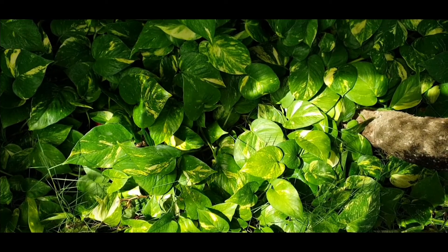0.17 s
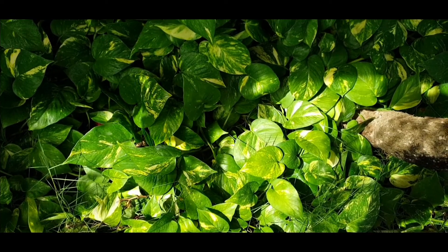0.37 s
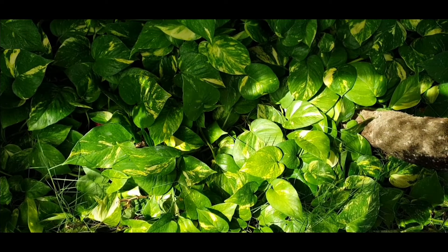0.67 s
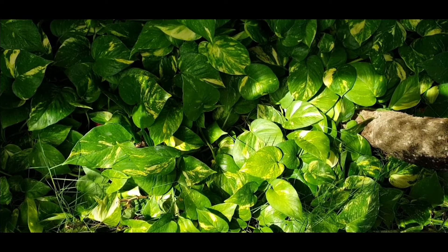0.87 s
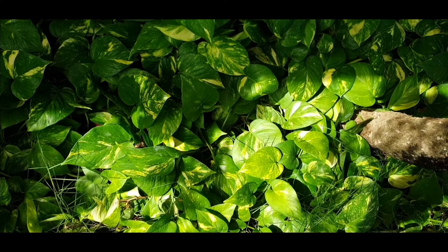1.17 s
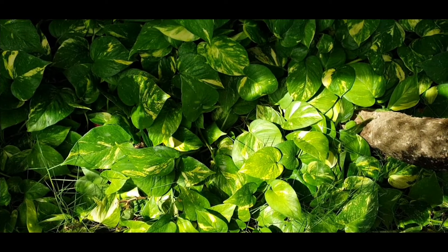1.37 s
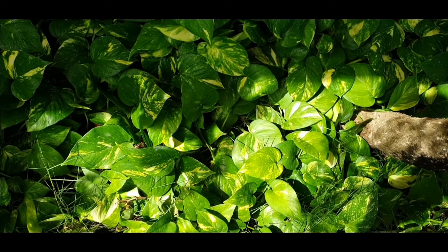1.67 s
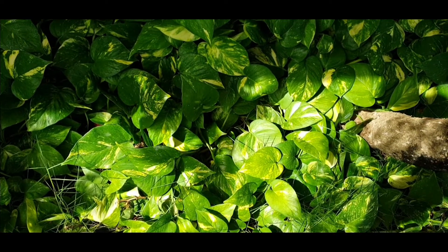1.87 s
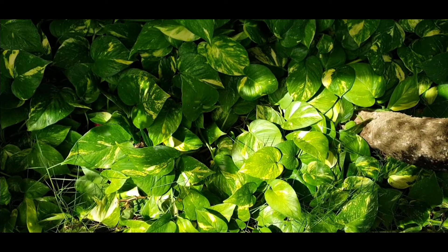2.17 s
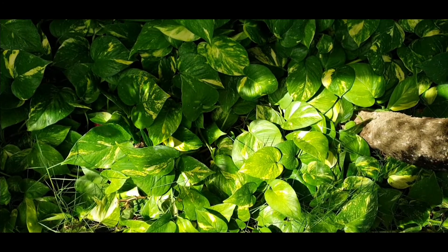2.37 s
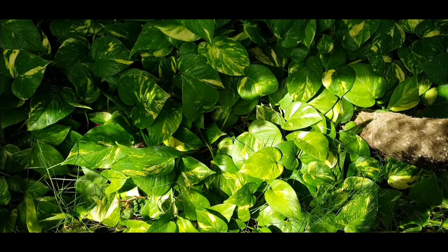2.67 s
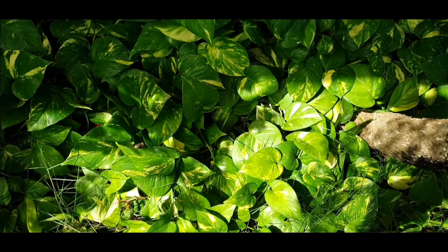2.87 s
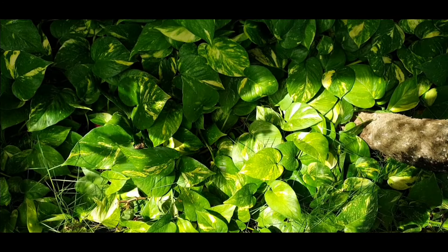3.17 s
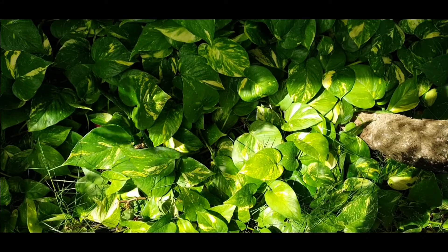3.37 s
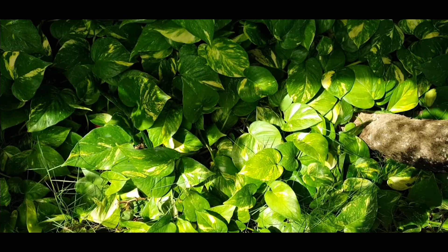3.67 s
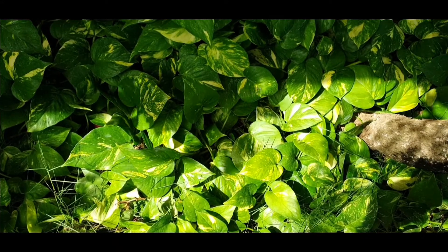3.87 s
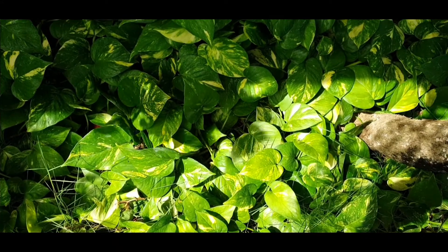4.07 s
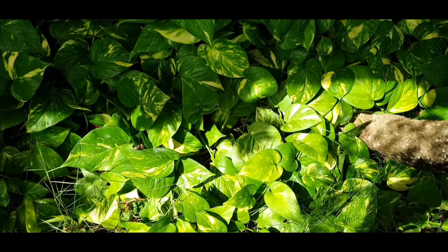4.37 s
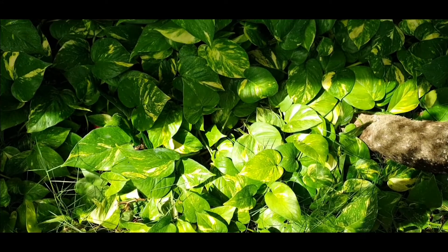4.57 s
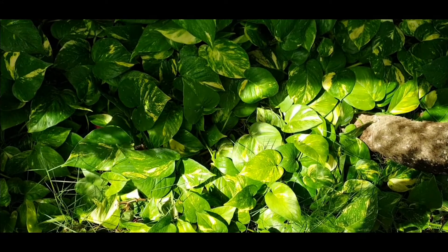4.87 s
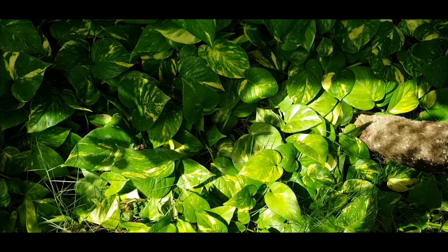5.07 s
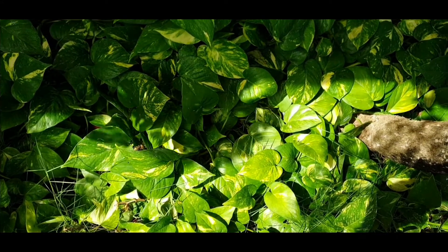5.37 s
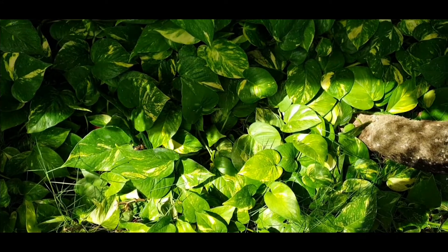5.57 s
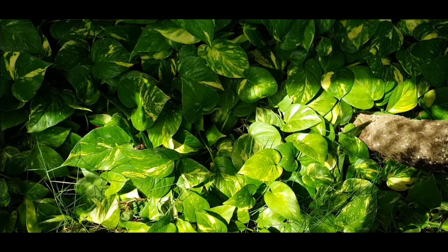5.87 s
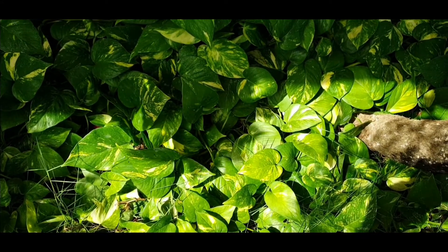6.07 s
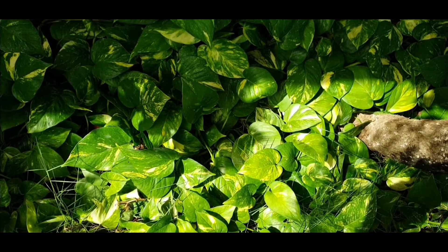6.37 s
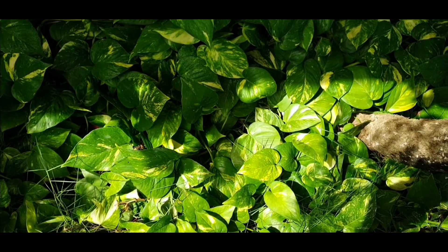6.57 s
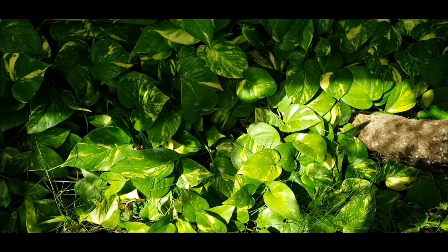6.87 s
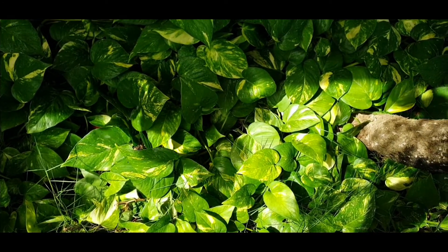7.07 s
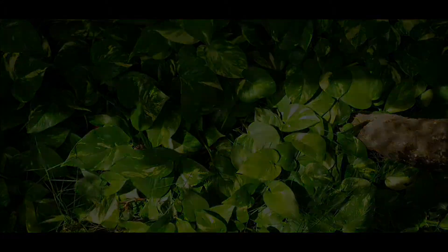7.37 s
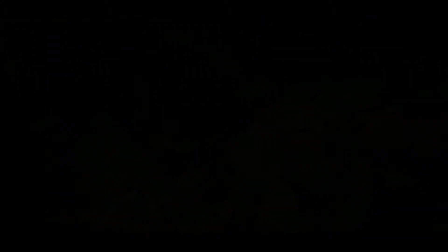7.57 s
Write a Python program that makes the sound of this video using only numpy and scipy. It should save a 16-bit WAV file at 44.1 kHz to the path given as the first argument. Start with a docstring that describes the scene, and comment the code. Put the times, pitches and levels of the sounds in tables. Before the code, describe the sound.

Leaves rustle softly and steadily in a garden breeze, the closest plants on the right giving a few dry ticks. Wind puffs briefly on the microphone at the start, then returns after a lull as irregular low buffeting and thumps on the left, louder than everything else. A few faint birds chirp, whistle and buzz from the trees over a low, distant rumble.

```python
"""Leaves rustle all round a garden as a light breeze brushes them together, the nearest on the right.
Gusts buffet the stereo microphone in short, low puffs, nearly all on its left port; hard eddies slap it.
A few birds whistle and buzz from the trees, each call one gliding tone with scattered echoes.
Behind them lie a thin blur of distant chirps and a low, far-off rumble."""
import sys
import numpy as np
from scipy import signal
from scipy.fft import rfft, irfft
from scipy.io import wavfile
from scipy.ndimage import uniform_filter1d

SR = 44100
rng = np.random.default_rng(int(sys.argv[2]) if len(sys.argv) > 2 else 0)


def dump_mix(stems):
    """Bounce the given channels to the path in sys.argv[1] as a 16-bit WAV at rate SR."""
    frames = np.atleast_2d(stems).T  # one column per channel
    limited = np.clip(frames, -1, 1)  # hard clip at full scale
    pcm = np.round(limited * 32767).astype(np.int16)
    wavfile.write(sys.argv[1], SR, pcm)


N = 340452
TIME = np.arange(N) / SR


def undb(db):
    """Decibels to gain."""
    return 10 ** (np.asarray(db) / 20)


def unit(x):
    """Scale to rms 1."""
    return x / np.sqrt(np.mean(x ** 2) + 1e-18)


def curve(rows):
    """Join rows of (seconds, value) with straight lines, sample by sample."""
    return np.interp(TIME, *np.transpose(rows))


def colour(x, points):
    """Filter by a curve of (Hz, dB) points, rolling off below the first; the result has rms 1."""
    hz, db = np.transpose(points)
    f = np.arange(N // 2 + 1) * SR / N + 1e-3
    skirt = np.minimum(f / hz[0], 1) ** 2
    gain = undb(np.interp(np.log(f), np.log(hz), db))
    return unit(irfft(rfft(x) * skirt * gain, N))


def walk(per_s):
    """A smooth random wander of rms 1 that takes per_s steps a second."""
    hold = max(int(SR / per_s), 2)
    steps = np.repeat(rng.standard_normal(N // hold + 1), hold)
    return unit(uniform_filter1d(uniform_filter1d(steps, hold), hold)[:N])


def add(track, start_s, sound):
    """Mix a sound into a track at a given time."""
    at = int(start_s * SR) + np.arange(len(sound))
    inside = (at >= 0) & (at < N)
    track[at[inside]] += sound[inside]


# The rumble from far beyond the garden. Each row: frequency in Hz, relative level in dB.
RUMBLE_SPECTRUM = [(20, -7), (40, -13), (65, 4.5), (115, 0), (170, -8), (240, -5.5), (340, -13), (700, -15),
                   (1000, -24), (2000, -37.5)]
# Its slow swell at the microphone. Each row: time in seconds, base level in dB.
RUMBLE_LEVELS = [(0, -49), (1.0, -47.5), (1.9, -49.5), (2.4, -50.5), (4.1, -53), (5.2, -52), (7.7, -50)]


def rumble():
    """Distant low noise reaches both ports almost alike; a faint far tone fades out of it."""
    common = colour(rng.standard_normal(N), RUMBLE_SPECTRUM)
    per_port = np.array([colour(rng.standard_normal(N), RUMBLE_SPECTRUM) for _ in range(2)])
    tone_hz = 700 + 11 * walk(40)
    tone_db = -62.5 + 1.4 * walk(4.56) - 1.4 * TIME
    tone = np.sin(2 * np.pi * np.cumsum(tone_hz) / SR) * undb(tone_db)
    swell = undb(curve(RUMBLE_LEVELS) + .8 * walk(4.6))
    return (common + undb(-11.5) * per_port) * swell + tone * np.array([[1], [.5]])


# Birds too far off to tell apart. Each row: band centre in Hz, width in Hz, full level in dB.
FAR_BIRD_BANDS = [(2835, 170, -65.5), (3305, 360, -63)]


def far_birds(fade_in_s=2):
    """Many distant chirps blur into two thin, flickering bands of noise."""
    out = np.zeros((2, N))
    for hz, width_hz, db in FAR_BIRD_BANDS:
        band = signal.butter(2, [hz - width_hz / 2, hz + width_hz / 2], "band", fs=SR, output="sos")
        blur = unit(signal.sosfilt(band, rng.standard_normal((2, N))))
        out += blur * undb(db + 1.15 * walk(18))
    return out * np.clip(TIME / fade_in_s, 0, 1)


def garden_echoes(x, t60_s=.5):
    """Trunks and walls scatter a short tail of echoes, different at each port."""
    t = TIME[:SR]
    tails = rng.standard_normal((2, SR)) * np.exp(-np.log(1000) * t / t60_s) * (1 - np.exp(-t / .008))
    tails /= np.sqrt(np.sum(tails ** 2, axis=1, keepdims=True))
    return signal.fftconvolve(x, tails, axes=1)[:, :N]


def bird_note(length_s, start_hz, end_hz, ease, hoarse_hz, buzz_depth_hz=0, buzz_rate_hz=283):
    """One gliding whistle: a fast warble makes it buzz, an uneven one makes it hoarse."""
    u = np.linspace(0, 1, int(length_s * SR))
    glide = end_hz + (start_hz - end_hz) * (1 - u) ** ease  # ease over 1 levels off, under 1 droops late
    warble_hz = buzz_rate_hz * (1 + .019 * walk(80)[:len(u)])
    warble = np.sin(2 * np.pi * np.cumsum(warble_hz) / SR)
    hz = glide + buzz_depth_hz * warble + hoarse_hz * walk(700)[:len(u)]
    swell = (u * (1 - u)) ** .8
    return unit(np.sin(2 * np.pi * np.cumsum(hz) / SR) * swell)


# Thin, buzzing calls, dead centre, that slide down and level off.
# Each row: start in seconds, length in seconds, final pitch in Hz, dry level in dB.
BUZZING_CALLS = [(-.11, 0.22, 7700, -51), (3.609, .25, 7520, -48.5), (4.767, .26, 7660, -51.5)]
# Short falling chips from a bird on the right. Each row: start in seconds, dry level in dB.
RIGHT_CHIPS = [(2.29, -58), (2.382, -55.5), (2.608, -57.5), (5.995, -54), (6.102, -56), (6.212, -52),
               (6.3, -55)]
# Slurred chirps from the trees on either side. Each row: start in seconds, starting pitch in Hz,
# dry level in dB, hoarseness in Hz, left minus right in dB.
SLURRED_CHIRPS = [(.01, 2680, -54.5, 110, 20), (2.38, 2810, -57, 180, 14), (4.56, 3580, -55.5, 220, -7),
                  (5.115, 3550, -52, 250, -5), (6.069, 3390, -51.5, 180, -3), (6.605, 3540, -53, 160, -6),
                  (7.065, 3235, -51, 160, 5), (7.514, 3580, -48, 40, 9), (7.586, 3240, -53, 50, 12.5)]
# Whistles from the trees, sagging a little. Each row: start in seconds, length in seconds,
# starting pitch in Hz, dry level in dB, left minus right in dB.
SAGGING_WHISTLES = [(2.92, .34, 4890, -59, -18), (3.45, .11, 2857, -48.5, 14.5), (6.66, .2, 4880, -65, -1),
                    (7.12, .15, 2790, -61, 2)]


def birds(echo_db=-2, chip_pan_db=-11):
    """Four kinds of call reach the microphone from the trees, directly and as echoes."""
    calls = [(s, db, 0, bird_note(length, 9000, hz, ease=2.4, hoarse_hz=24.7, buzz_depth_hz=300))
             for s, length, hz, db in BUZZING_CALLS]
    calls += [(s, db, chip_pan_db, bird_note(.05, 5340, 4950, ease=1.1, hoarse_hz=189))
              for s, db in RIGHT_CHIPS]
    calls += [(s, db, pan_db, bird_note(.0895, hz, .91 * hz, ease=1.8, hoarse_hz=hoarse_hz))
              for s, hz, db, hoarse_hz, pan_db in SLURRED_CHIRPS]
    calls += [(s, db, pan_db, bird_note(length, hz, hz - 80, ease=.574, hoarse_hz=28))
              for s, length, hz, db, pan_db in SAGGING_WHISTLES]
    direct = np.zeros((2, N))
    for s, db, pan_db, sound in calls:
        add(direct[0], s, sound * undb(db + pan_db / 2))
        add(direct[1], s, sound * undb(db - pan_db / 2))
    wet = undb(echo_db)
    return (direct + wet * garden_echoes(direct)) / np.hypot(1, wet)


def eddies(noise, eddy_hz, port_hz=63.3, port_q=1.39, low_cut_hz=28):
    """Turbulent pressure on a resonant port: strong up to the eddy rate, falling away above it."""
    f = np.arange(len(noise) // 2 + 1) * SR / len(noise)
    ratio = f / port_hz
    resonance = ratio ** 2 / np.hypot(1 - ratio ** 2, ratio / port_q)
    low_cut = f / np.hypot(f, low_cut_hz)
    cascade = 1 / np.sqrt(1 + (f / eddy_hz) ** 5.17)
    damping = 1 / np.sqrt(1 + (f / (3.8 * eddy_hz)) ** 11)  # the smallest eddies die out
    return irfft(rfft(noise) * resonance * low_cut * cascade * damping, len(noise))


# Gusts right on the microphone. Each row: start in seconds, length in seconds, level in dB,
# eddy rate in Hz, port (0 left, 1 right).
MIC_GUSTS = [(0.106, 0.073, -33, 54, 0), (0.311, 0.09, -28, 45, 0), (.39, 0.16, -35, 52, 0),
             (2.057, 0.38, -48, 60, 0), (2.589, 0.06, -30.5, 67, 0), (2.684, 0.047, -32, 74, 0),
             (2.815, 0.12, -29, 65, 0), (2.939, 0.64, -27, 75.4, 0), (3.191, 0.16, -30.5, 58, 1),
             (3.569, 0.12, -32, 161, 0), (3.699, 0.051, -34, 67, 0), (3.78, 0.173, -29.5, 128, 0),
             (4.387, 0.051, -33.5, 86, 0), (4.549, 0.15, -37.5, 59, 1), (4.758, 0.093, -30.5, 80, 0),
             (4.873, .12, -37.5, 56, 0), (5.129, .17, -25.5, 94, 0), (5.395, 0.07, -27, 79, 0),
             (5.527, 0.048, -36, 161, 0), (5.624, .2, -23.5, 72.6, 0), (5.85, .17, -24.5, 80, 0),
             (6.04, 0.135, -28, 82.5, 0), (6.18, 0.085, -20.5, 93, 0), (6.254, .25, -36, 60, 0),
             (6.515, .06, -30, 53, 0), (6.992, 0.089, -30.5, 51, 0)]


def wind(draught_db=(-52, -58.5), attack_s=.018, release_s=.02, buffet_db=3.5):
    """Over a light draught on both ports, each gust rises on one, buffets it and drops away."""
    out = np.array([unit(eddies(rng.standard_normal(N), eddy_hz=50)) * undb(db + walk(4.4))
                    for db in draught_db])
    buffet = undb(buffet_db * walk(per_s=36))  # the pressure lurches within a gust
    for s, length, db, eddy_hz, port in MIC_GUSTS:
        noise = rng.standard_normal(2 ** 16)
        t = TIME[:int(length * SR)]
        ramp = np.clip(np.minimum(t / attack_s, (length - t) / release_s), 0, 1)
        swell = np.sin(np.pi / 2 * ramp) ** 2
        gust = eddies(noise, eddy_hz)[:len(t)] * swell * np.interp(s + t, TIME, buffet)
        add(out[port], s, unit(gust) * undb(db))
    return out


# Hard eddies striking the left port. Each row: time of the peak in seconds, core peak in dB, pitch in Hz.
MIC_SLAPS = [(2.975, -21, 195), (3.035, -20, 100), (3.081, -25, 190), (3.161, -19, 193),
             (3.304, -18.5, 195), (3.422, -23, 90), (3.535, -16, 200), (3.932, -19, 210),
             (5.230, -10.5, 240), (5.28, -18.5, 230), (5.92, -22, 130), (6.221, -20, 140)]


def wind_slaps(flurry_s=.07, flurry_db=-14):
    """A vortex core is a sharp suction between two small pushes, wrapped in a flurry of fast eddies."""
    out = np.zeros((2, N))
    swell = np.hanning(int(flurry_s * SR))
    for s, db, hz in MIC_SLAPS:
        x = np.linspace(-np.pi, np.pi, int(2 * SR / hz))
        core = (2 * x ** 2 - 1) * np.exp(-x ** 2)
        add(out[0], s - 1 / hz, core * undb(db))
        turbulence = eddies(rng.standard_normal(2 ** 14), eddy_hz=.73 * hz)
        flurry = unit(turbulence[:len(swell)] * swell)
        add(out[0], s - flurry_s / 2, flurry * undb(db + flurry_db))
    return out


# Single leaves tapping, mostly right of the microphone. Each row: start in seconds, level in dB,
# brightest frequency in Hz, decay in seconds, left minus right in dB.
LEAF_TAPS = [(0.066, -41, 4800, 0.012, -5), (1.306, -47, 12000, .006, -13), (1.607, -42, 12500, 0.012, -10),
             (1.756, -42, 3600, 0.02, -6), (2.208, -48, 12000, .008, -12), (6.273, -44, 5970, 0.0048, 2),
             (6.552, -51, 12000, .007, -10), (6.653, -52, 13000, .007, -9)]


def leaf_taps():
    """A stiff leaf flicks against another: a short, dry tick of noise."""
    out = np.zeros((2, N))
    t = TIME[:SR // 8]
    for s, db, hz, decay_s, pan_db in LEAF_TAPS:
        band = signal.butter(1, [.65 * hz, min(1.4 * hz, .45 * SR)], "band", fs=SR, output="sos")
        tick = unit(signal.sosfilt(band, rng.standard_normal((2, len(t))))) * np.exp(-t / decay_s)
        add(out[0], s, tick[0] * undb(db + pan_db / 2))
        add(out[1], s, tick[1] * undb(db - pan_db / 2))
    return out


def leaf_contacts(per_s, spread_db, scrape_s):
    """Leaves touch at random: each contact is a tiny scrape, most weak and a few strong."""
    hit = rng.random(N) < per_s / SR
    size = undb(spread_db * np.minimum(rng.exponential(size=N), 5))
    energy = signal.lfilter([1], [1, -np.exp(-1 / (scrape_s * SR))], hit * size ** 2)
    return unit(np.sqrt(energy) * rng.standard_normal(N))


# The breeze in the garden's foliage. Each row: time in seconds, base rustle level in dB.
BREEZE_LEVELS = [(0, -48), (0.4, -48.5), (0.8, -48), (1.2, -46.5), (1.7, -45.5), (2.2, -48), (2.75, -50),
                 (3.8, -49.5), (4.4, -50), (5.3, -50), (5.8, -49.5), (6.2, -49.5), (6.8, -51.5),
                 (7.3, -52.5), (7.55, -53.5)]
# The canopy all round the microphone. Each row: frequency in Hz, relative level in dB.
CANOPY_SPECTRUM = [(300, -7.5), (600, -4.5), (950, -7), (1400, -3), (2300, -4), (3100, -3), (4500, -4),
                   (7600, -4.5), (8400, -9), (9300, -24.5), (11800, -18), (15500, -29)]
# The plants close by on the right. Each row: frequency in Hz, relative level in dB.
NEAR_LEAF_SPECTRUM = [(700, -21), (1300, -6.5), (2200, -5.5), (3100, 1), (4300, 1), (5200, -3), (6100, -8),
                      (7600, -7), (8400, -47), (9200, -20.5), (10300, -17.5), (11800, -13.5),
                      (13300, -16.5), (15500, -15.5)]


def leaves(bent_gain=.44, lag_s=.00025):
    """A smooth wash from the canopy and grainier brushing close by; more breeze means more contacts."""
    breeze_db = curve(BREEZE_LEVELS)
    stir = undb(breeze_db - np.mean(breeze_db))
    rustle_db = breeze_db + .29 * walk(22)
    left, right = (leaf_contacts(5000 * stir, spread_db=1.5, scrape_s=.0015) for _ in range(2))
    # the lower part of the rustle on the right bends round to the left port, a little late
    bent = signal.sosfiltfilt(signal.butter(1, 2800, fs=SR, output="sos"), right)
    left = left + bent_gain * np.roll(bent, int(lag_s * SR))
    out = np.array([colour(left, CANOPY_SPECTRUM) * undb(rustle_db + 2.4),
                    colour(right, CANOPY_SPECTRUM) * undb(rustle_db + 1.6)])
    near = colour(leaf_contacts(1500 * stir, spread_db=2, scrape_s=.011), NEAR_LEAF_SPECTRUM)
    sway_db = .64 * walk(7)
    out[1] += near * undb(rustle_db + sway_db + 7)
    return out


def scene():
    """The garden as it reaches the microphone's two ports."""
    return leaves() + leaf_taps() + rumble() + wind() + wind_slaps() + birds() + far_birds()


def record(dry, stop_s=7.69, top_hz=15600):
    """The sound fades quickly just before the end, and the highest treble is cut."""
    fade = np.clip((stop_s - TIME) / .02, 0, 1)
    low_pass = signal.ellip(10, .1, 80, top_hz, fs=SR, output="sos")
    return signal.sosfilt(low_pass, dry * fade)


dry = scene()
out = record(dry)
dump_mix(out)
```